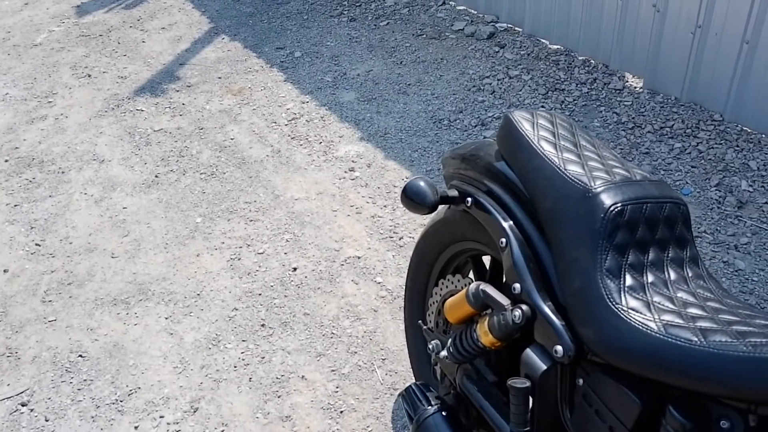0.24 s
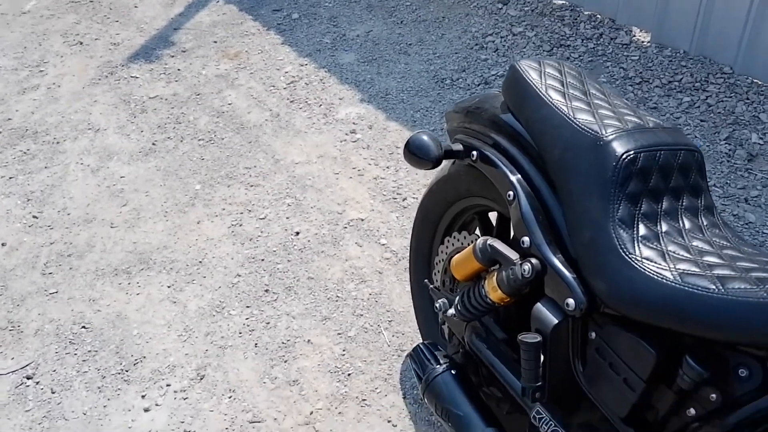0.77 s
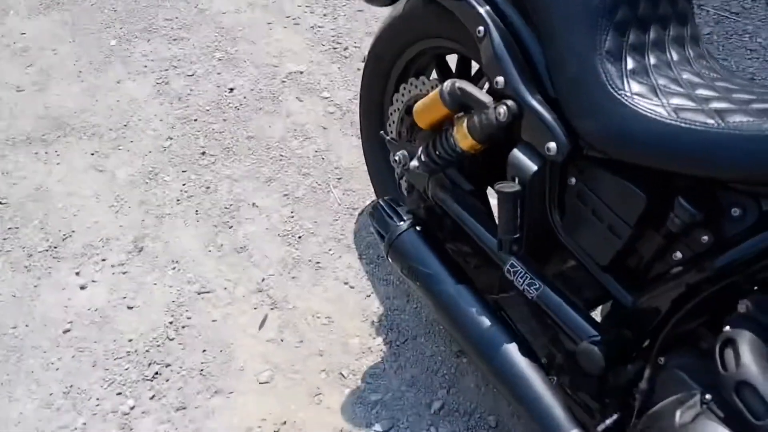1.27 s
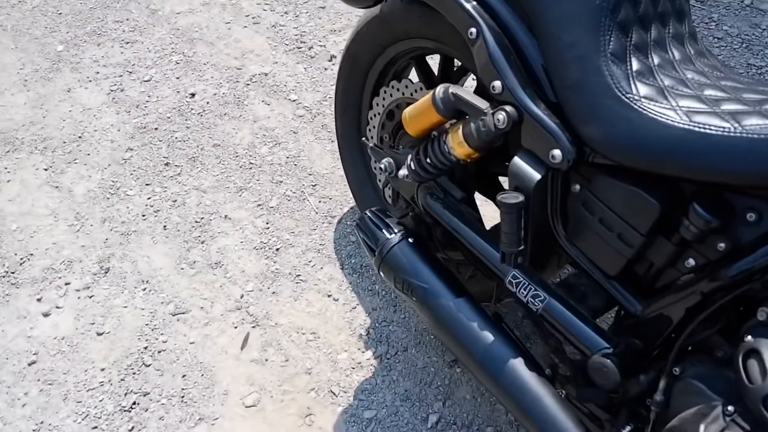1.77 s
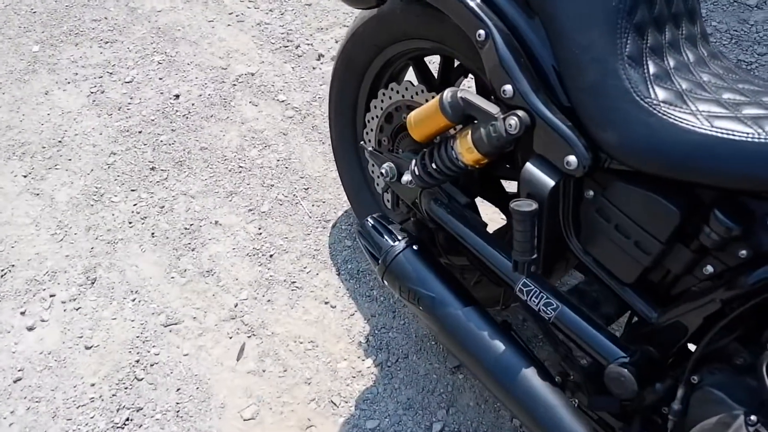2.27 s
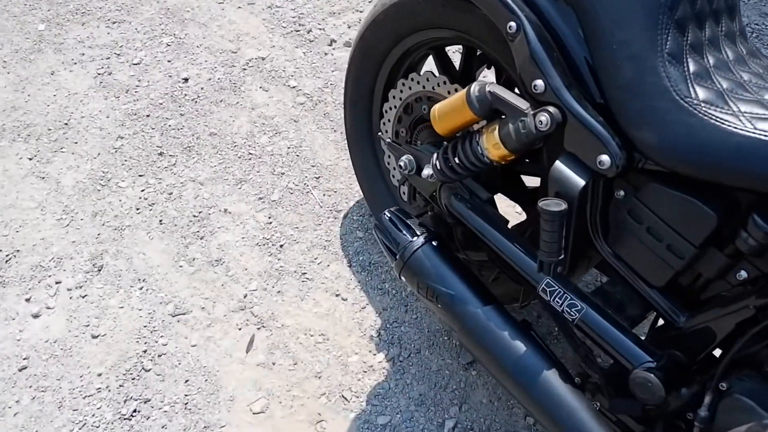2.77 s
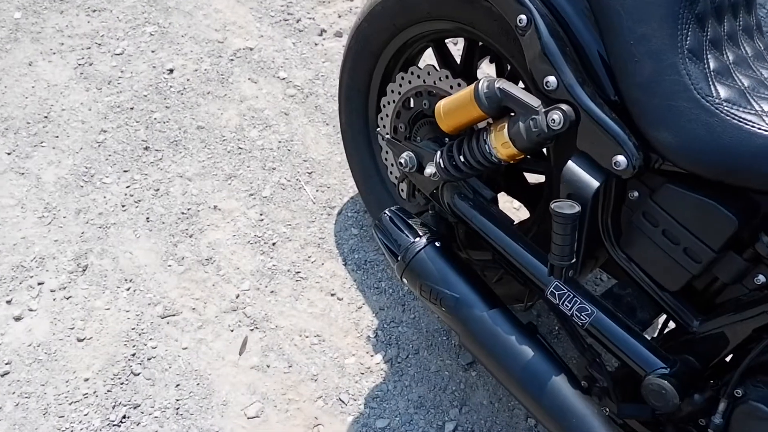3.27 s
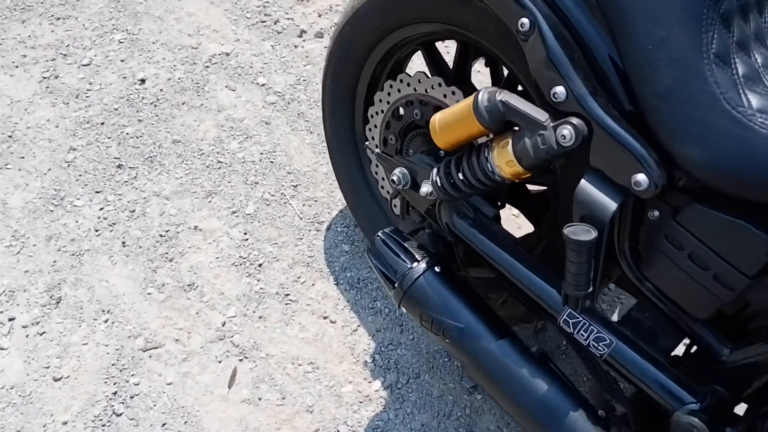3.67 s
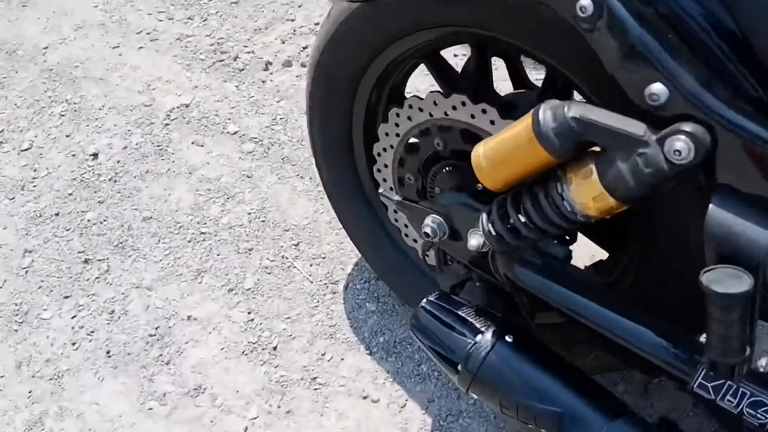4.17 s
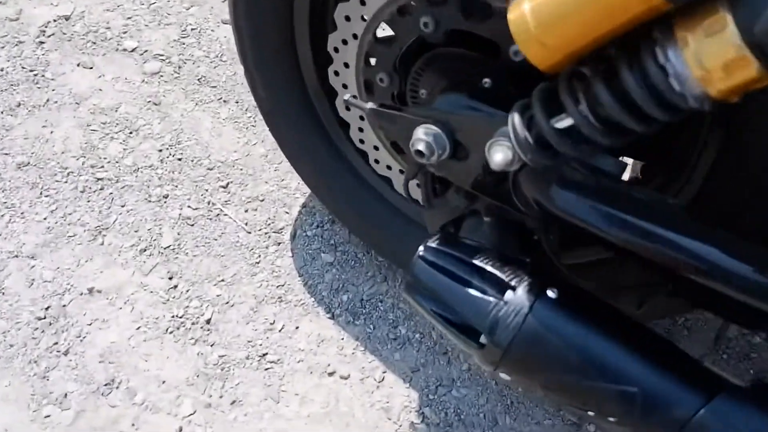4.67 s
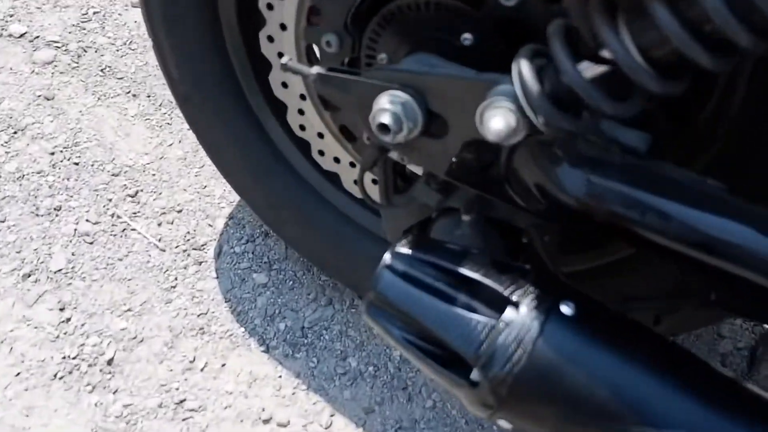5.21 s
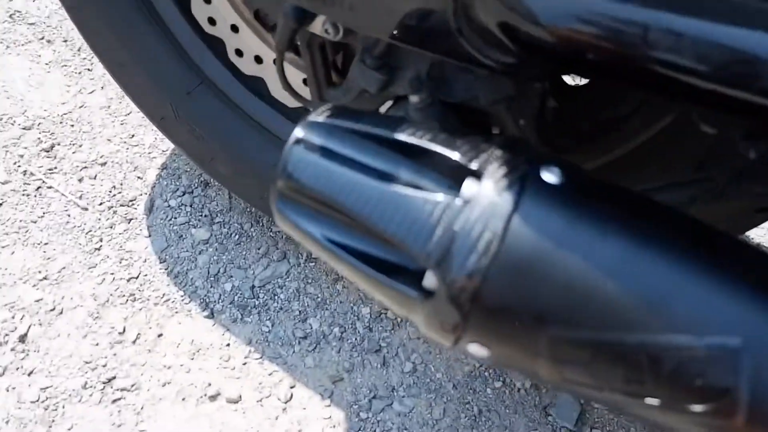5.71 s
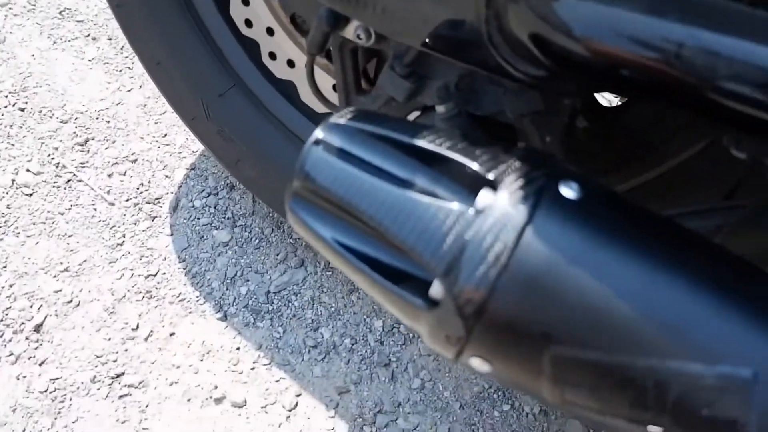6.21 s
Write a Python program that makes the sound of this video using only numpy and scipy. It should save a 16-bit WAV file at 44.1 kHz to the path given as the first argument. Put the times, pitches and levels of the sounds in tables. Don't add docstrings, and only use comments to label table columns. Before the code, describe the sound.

Deep, cracking throttle blips bark from a big twin motorcycle's exhaust outdoors, fall away in pops, and settle into uneven thumping close to the tailpipe.

```python
import sys
import numpy as np
from scipy import signal
from scipy.fft import rfft, irfft, next_fast_len
from scipy.io import wavfile
from scipy.ndimage import uniform_filter1d

SR = 44100
rng = np.random.default_rng(int(sys.argv[2]) if len(sys.argv) > 2 else 0)


def put_to_file(sound):
    columns = np.atleast_2d(sound).T
    safe = np.clip(columns, -1, 1)
    whole_steps = np.round(safe * 32767)
    wavfile.write(sys.argv[1], SR, whole_steps.astype(np.int16))


def gain_from_db(level_db):
    decades = np.asarray(level_db, float) / 20
    return 10 ** decades


N = 284439

# (from [s], to [s])
COASTS = [
    (2.18, 2.515),
    (2.88, 3.19),
]
# (open [s], shut [s], thump [dB], crack on opening [dB], crack on shutting [dB])
BLIPS = [
    (.04, .23, -3, -22, -25),
    (1.77, 2.12, -4, -24, -29),
    (2.72, 2.852, -6, -23, -26),
]
# (from [s], slug [ms], ring [Hz], ring width [Hz], bass cut [Hz], lead [ms])
PIPES = [
    (0, .3, 220, 165, 83, 1.8),
    (.1, .17, 230, 300, 60, 1.7),
    (.235, .3, 220, 165, 83, 1.8),
    (.6, .3, 140, 52, 67, 2.5),
    (1.75, .22, 220, 290, 80, 1.75),
    (2.16, .29, 206, 153, 70, 2.2),
    (3.6, .31, 122, 83, 55, 2.7),
    (4.6, .55, 126, 80, 52, 3.5),
]
# (front firing [s], engine cycles so far [count], cycle length then [ms])
CRANK = [(-.011, -1, 62), (.219, 3, 50), (.579, 10, 58), (1.036, 17, 76), (1.301, 20, 97), (1.6979, 24, 95),
         (1.9116, 27, 52), (2.1820, 34, 33.5), (2.3199, 38, 36.1), (2.5153, 43, 42), (2.691, 47, 43.5),
         (2.9122, 53, 31.7), (3.1517, 60, 37.5), (3.4987, 68, 57), (4.1611, 77, 90), (4.6618, 82, 113),
         (5.0128, 85, 116), (5.4552, 89, 109), (6.463, 98, 111)]
# (time [s], gear activity [dB], pumping in the pipe [dB], gas rush [dB])
BETWEEN = [(0, -33, -8.5, -21), (.45, -47, -25.5, -43), (.8, -45.5, -15.5, -40), (1.2, -39.5, -12.5, -33),
           (1.42, -36, -13.5, -29), (1.75, -38, -15, -33), (2.05, -42.5, -16, -29.5),
           (2.35, -41.5, -10, -36.5), (2.9, -42, -23.5, -32.5), (3.12, -41.5, -16.5, -31.5),
           (3.5, -42, -16.5, -45.5), (4.05, -40.5, -15, -33.5), (4.5, -43.5, -21, -38.5),
           (5.0, -40.5, -21, -29), (5.35, -40.5, -17.5, -29), (5.6, -47.5, -22, -36.5),
           (5.8, -43.5, -24, -30), (6.45, -44, -22.5, -35.5)]
# (time [s], thump [dB], crack [dB])
POPS = [
    (1.6795, -7, -27),
    (2.528, -39, -57),
    (3.9696, -3, -35),
]


def in_time(rows):
    s, *columns = np.transpose(rows)
    return [np.interp(np.arange(N) / SR, s, column) for column in columns]


def at_hz(points, hz):
    point_hz, db = np.transpose(points)
    return np.interp(np.log(hz + 1), np.log(point_hz), db)


def rms_one(x):
    return x / np.sqrt(np.mean(x ** 2) + 1e-20)


def decay(x, ms):
    return signal.lfilter([1], [1, -np.exp(-1000 / (ms * SR))], x + 1e-18)


def rms_gate(train, rise_ms, fall_ms):
    swell = decay(decay(decay(train, fall_ms), rise_ms), rise_ms)
    return swell / (rise_ms * SR / 1000) ** 2


def resonate(x, hz, width_hz):
    r = np.exp(-np.pi * width_hz / SR)
    top = np.array([1, 0, -1]) * (1 - r * r) / 2
    return signal.lfilter(top, [1, -2 * r * np.cos(2 * np.pi * hz / SR), r * r], x)


def cut(x, order, hz, kind="low"):
    return signal.sosfilt(signal.butter(order, hz, kind, fs=SR, output="sos"), x)


def clicks(times, heights):
    out = np.zeros(N)
    at = np.round(np.asarray(times) * SR).astype(int)
    np.add.at(out, np.clip(at, 0, N - 1), heights)
    return out


def stereo_noise(spectrum):
    # (frequency [Hz], left-right likeness [0-1])
    likeness = [(300, 1), (1000, 0.98), (2500, 0.9), (5000, 0.89), (8000, 0.24), (12000, 0.33)]
    size = next_fast_len(N)
    hz = np.fft.rfftfreq(size, 1 / SR)
    mid, side = rfft(rng.standard_normal((2, size))) * gain_from_db(at_hz(spectrum, hz))
    alike = np.clip(at_hz(likeness, hz), 0, 1)
    ports = np.sqrt(1 + alike) * mid + np.sqrt(1 - alike) * side * [[1], [-1]]
    return rms_one(irfft(ports, size)[:, :N])


def nearest(s, times):
    return np.abs(s[:, None] - np.asarray(times)).argmin(axis=0)


def spans(rows, s):
    return sum((s >= row[0]) & (s < row[1]) for row in rows)


def crank_time(turns):
    s, cycle, ms = np.transpose(CRANK)
    k = np.clip(np.searchsorted(cycle, turns, "right") - 1, 0, len(s) - 2)
    span = cycle[k + 1] - cycle[k]
    u = (turns - cycle[k]) / span
    glide = span * u * (1 - u) * ((1 - u) * ms[k] - u * ms[k + 1]) / 1000
    return s[k] + (s[k + 1] - s[k]) * u * u * (3 - 2 * u) + glide, np.interp(turns, cycle, ms)


def firing_times(marked_s):
    cycles = np.arange(CRANK[0][1], CRANK[-1][1])
    rear_share = np.interp(crank_time(cycles)[1], [32, 36, 110], [.457, .44, .425])
    s = crank_time(np.column_stack([cycles + rear_share, cycles + 1]).ravel()[:-1])[0]
    at = nearest(s, marked_s)
    known_shift = {2 * cycle + 1: 0 for _, cycle, _ in CRANK}
    known_shift.update(zip(at, marked_s - s[at]))
    return s + np.interp(np.arange(len(s)), *np.transpose(sorted(known_shift.items()))), at


def all_firings():
    # (time [s], rear thump [dB], front minus rear [dB], crack [dB])
    shut_burn = [(0, -23, -3, -39), (.25, -16, -10, -26.5), (.6, -15, -1, -49), (1.0, -11.5, -8.5, -41.5),
                 (1.45, -9.5, 10, -45), (2.16, -5, -2, -34), (2.3, -6.5, 0, -32), (2.42, -9.5, 2.5, -32),
                 (2.52, -8, -0.5, -34), (2.58, -8, -17, -38), (2.87, -9.5, -2, -39), (3.03, -6, -2.5, -35),
                 (3.13, -8, 0, -31), (3.2, -16.5, -0.5, -34), (3.6, -6.5, -3, -50), (4.299, -21, 14, -50.5),
                 (4.752, -0.5, -2.5, -34), (6.45, -1, 2.5, -39.5)]
    # (time [s], thump [dB],
    # crack [dB])
    single_firings = [(.0178, -13, -42), (.2916, -10.5, -39), (.342, -11.5, -35), (2.1265, -11.5, -35),
                      (2.1595, -5, -41), (1.9116, -6, -25), (2.8268, -12, -23.5), (.0602, -3, -39),
                      (.0823, -22, -53), (.108, -1, -21.5), (.1366, -1.5, -23.5), (.1699, -4.5, -25),
                      (.1916, -4.5, -20.5), (.219, -6, -32), (1.6979, -0.5, -21.5), (1.7828, -3, -20),
                      (1.8519, -3.5, -21), (1.8782, -4, -26.5), (1.9292, -7, -29), (1.9578, -3.5, -28.5),
                      (2.0018, -7, -29), (2.0392, -4.5, -23.5), (2.0785, -3.5, -28.5), (2.112, -3, -30),
                      (2.7091, -1.5, -31.5), (2.7343, -1.1, -24), (2.7524, -3, -21), (2.7754, -5, -18),
                      (2.8127, -4.5, -19.5), (2.8424, -5.5, -28),
                      (3.5959, -10.5, -31.5), (0.5546, -13.5, -36), (0.7331, -10.5, -49), (0.9971, -13, -63),
            (1.154, -8, -51), (1.3974, -8, -49), (1.4943, -2.5, -38), (1.6, -3, -31.5), (2.5303, -5.5, -54),
            (2.5765, -10, -32), (2.6225, -7, -28.5), (3.247, -5.5, -31.5), (3.2902, -8.5, -29),
            (3.3316, -8, -30), (3.4197, -8, -29), (3.467, -6.5, -26.5), (3.528, -9.5, -30.5),
            (3.6189, -13, -27.5), (3.786, -4.5, -32), (3.911, -8, -30.5), (5.238, -0.5, -38),
            (4.1601, -1.5, -27.5), (4.1955, 3.5, -22.5), (4.4802, -0.5, -27.5), (4.891, -1.5, -34),
            (5.0603, -.5, -29.5), (5.502, 0, -29), (5.569, -6.5, -44), (5.6847, -4.5, -40.5),
            (5.797, -1.5, -35.5), (5.349, -2, -34.5), (5.8436, -3.5, -43), (5.9094, -3.5, -43),
            (5.9565, -0.5, -37.5), (6.021, -2.5, -38.5), (6.0668, -3.5, -43), (6.1297, -2, -39),
            (6.24, -2.5, -41), (6.352, -1.5, -42)]
    weak_s = [.247, .971, 1.304, 1.532, 1.74, 2.093, 2.144, 3.193, 3.939, 4.384, 4.713, 4.932, 5.176, 5.399,
              5.632, 6.285]
    dead_s = [.276, .319, 4.068, 4.117, 4.243, 4.289, 4.556]
    marked = np.array(sorted(single_firings))
    s, at = firing_times(marked[:, 0])
    t, *burn = np.transpose(shut_burn)
    thump_db, front_db, crack_db = (np.interp(s, t, column) for column in burn)
    loss_db = front_db * (np.arange(len(s)) % 2)
    for start, end, blip_db, first_db, last_db in BLIPS:
        on = (s >= start) & (s < end)
        thump_db[on] = blip_db
        crack_db[on] = np.interp(s[on], [start, end], [first_db, last_db])
        loss_db[on] = 0
    loss_db[nearest(s, weak_s)] = -13.5
    even_db, uneven_db = [.5, 1.5], [1.2, 2]
    scatter_db = rng.standard_normal((len(s), 2)) * np.where(spans(COASTS, s)[:, None], even_db, uneven_db)
    thump_db = thump_db + loss_db + scatter_db[:, 0]
    crack_db = crack_db + 0.97 * loss_db + scatter_db[:, 1]
    dead = nearest(s, dead_s)
    thump_db[dead] = thump_db[dead] - 25
    crack_db[dead] = crack_db[dead] - 8
    thump_db[at], crack_db[at] = marked[:, 1], marked[:, 2]
    return s, thump_db, crack_db


def pipe_response(slug_ms, ring_hz, width_hz, cut_hz, echoes):
    ms, gain = np.vstack([(0, 1), echoes]).T
    early, late = (clicks(ms / 1000, gain * part)[:SR // 12] for part in (ms < 14.1, ms >= 14.1))
    slug = early + cut(late, 2, 300)
    for _ in range(3):
        slug = decay(slug, slug_ms)
    out = cut(resonate(slug, ring_hz, width_hz), 4, cut_hz, "high")
    return out / -out[:SR // 200].min()


def thumps(s, thump_db):
    # (rear header delay [ms], rear gain [ratio], front header delay [ms], front gain [ratio])
    blip = [(1.5, 0.43, 1.6, 0.56), (5.4, -0.29, 3.4, 0.28), (8.5, 0.39, 5.6, -0.17),
            (22.7, 0.32, 8.5, 0.35), (35.7, 0.28, 14.0, 0.21)]
    opening = [(2.8, -.55, 2.4, -.42), (5.9, -.34, 5.4, -.38), (9.1, .19, 8.5, .37),
               (10.5, -.38, 10.5, -.37), (22.9, .16, 14.0, .3)]
    cooling = [(3.6, 0.15, 1.8, -0.47), (5.6, -0.13, 5.6, -0.69), (23.6, 0.13, 9.6, -0.3),
               (31.4, 0.12, 10.7, -0.58), (38.6, -0.14, 24.9, -0.39)]
    hot = [(2.7, -0.49, 2.7, -0.4), (4.7, -0.4, 4.9, -0.53), (8.9, 0.24, 9.3, 0.22),
           (10.5, -0.24, 10.5, -0.55), (14.3, 0.38, 16.1, -0.27)]
    falling = [(5.0, -.1, 1.4, -.22), (6.8, .25, 4.8, -.45), (8.6, .4, 6.4, .42), (11.8, -.15, 10.5, -.43),
               (14.7, .25, 14.8, .25), (25, -.16, 32, .1)]
    slowing = [(2.0, -0.71, 2.2, -0.76), (3.3, -0.26, 7.4, 0.45), (6.2, -0.32, 12.2, 0.31),
               (10.9, -0.28, 13.8, 0.69), (18.0, -0.17, 31.4, -0.53)]
    close_by = [(1.8, -.3, 2.0, -.35), (4.0, .2, 10.3, -.15), (10.5, .27, 22.7, .42),
                (14.7, .15, 28.6, .55), (16.2, .63, 31.5, -.2), (33.5, .14, 34.1, .3)]
    state = np.searchsorted([row[0] for row in PIPES], s, "right") - 1
    state[spans(BLIPS[1:], s) > 0] = 4
    front = np.arange(len(s)) % 2
    out = np.zeros(N)
    for k, echoes in enumerate([blip, opening, blip, cooling, hot, falling, slowing, close_by]):
        start, slug_ms, ring_hz, width_hz, cut_hz, lead_ms = PIPES[k]
        for header, taps in enumerate(np.hsplit(np.array(echoes), 2)):
            train = clicks(s - lead_ms / 1000, gain_from_db(thump_db) * (state == k) * (front == header))
            response = pipe_response(slug_ms, ring_hz, width_hz, cut_hz, taps)
            out += signal.oaconvolve(train, response)[:N]
    return out


def punch(s, thump_db):
    # (frequency [Hz], width [Hz], level [dB], throttle open adds [dB],
    # coast adds [dB], nearness to the tailpipe adds [dB])
    outlet = [(470, 550, -24.5, 16.5, 3.5, -2.5), (670, 320, -18.5, 9.5, 8, 1),
              (840, 520, -21.5, 1.5, 10.5, 7.5), (1208, 230, -35.5, 5, 7, 10.5),
              (1617, 104, -43, 10.5, 11.5, 3.5), (2310, 700, -39.5, 5.5, -2, 5),
              (313, 45, -34, 3, 8.5, -2.5)]
    coast, blipped, near = spans(COASTS, s), spans(BLIPS, s), s > PIPES[-1][0]
    face_s = s - .0012 + .0055 * coast * (np.arange(len(s)) % 2)
    heat_db = np.where(s > PIPES[1][0], 0.5, -7) * spans(BLIPS[:1], s)
    vary_db = rng.normal(0, 1, (len(s), len(outlet))) * (2.5 - 2 * coast[:, None])
    out = 0
    for k, (hz, width, db, open_db, coast_db, close_db) in enumerate(outlet):
        state_db = open_db * blipped + coast_db * coast + close_db * near
        face = clicks(face_s, gain_from_db(thump_db + db + heat_db + state_db + vary_db[:, k]))
        out = out + (-1) ** k * SR / width / np.pi * resonate(face + 1e-18, hz, width)
    out = cut(out, 2, 3500)
    return out + gain_from_db(-3.5) * np.roll(out, round(.0165 * SR))


def cracks(s, crack_db, bed_db):
    # (frequency [Hz], level per Hz [dB])
    crack_colour = [(290, -35), (500, -3), (562, -24), (690, -11.5), (953, -9.5), (1320, -21),
                    (1600, -10.5), (1910, -18.5), (2570, -14), (3790, -26), (4420, -21.5), (5430, -24),
                    (6850, -30), (7500, -28), (10900, -50.5), (14200, -75), (22000, -120)]
    bed = gain_from_db(bed_db[(s * SR).astype(int)])
    above = np.sqrt(np.maximum(gain_from_db(crack_db) ** 2 - bed ** 2, 0))
    train = clicks(s - .0018, above)
    burst = rms_gate(train, rise_ms=0.82, fall_ms=1.46)
    jet = gain_from_db(-11) * rms_gate(train, rise_ms=3.06, fall_ms=7.15)
    wall = gain_from_db(-49.0) * np.roll(burst, round(0.011 * SR))
    ragged = gain_from_db(2.46 * rms_one(decay(rng.standard_normal(N), 0.72)))
    return gain_from_db(12) * (burst + wall + jet) * ragged * stereo_noise(crack_colour)


def knocks(s, crack_db):
    # (frequency [Hz], width [Hz], level [dB])
    can = [(540, 120, -6), (940, 150, -2.5), (1178, 160, -12.5), (1620, 70, -9), (2590, 146, -11),
           (4300, 300, -24)]
    strength = gain_from_db(rng.normal(0, 3.5, (len(s), len(can))) + crack_db[:, None])
    out = np.zeros(N)
    for k, (hz, width, db) in enumerate(can):
        out += gain_from_db(db) * SR / width * resonate(clicks(s, strength[:, k]), hz, width)
    return gain_from_db(-22.5) * (out + gain_from_db(-10.5) * np.roll(out, round(.0165 * SR)))


def drone(drone_db):
    # (frequency [Hz], width [Hz], level [dB])
    pipe_modes = [(69.3, 30, -8), (144.7, 21.9, 0), (210.5, 75.5, -3.5), (320.5, 37, -13.5)]
    hum = np.zeros(N)
    for hz, width, db in pipe_modes:
        white = rng.standard_normal(N)
        hum += gain_from_db(db) * rms_one(resonate(resonate(white, hz, width), hz, 2 * width))
    time = np.arange(N) / SR
    even = sum(np.clip(np.minimum(time - start, end - time) / .03, 0, 1) for start, end in COASTS)
    return gain_from_db(drone_db - 2.5 - 10 * even) * rms_one(hum)


def clatter(s, stronger_db, rasp_db, clatter_db):
    # (frequency [Hz], level per Hz [dB])
    rasp_far = [(250, -26), (340, -4), (390, -9), (450, -1), (580, -4), (710, -16), (930, -11), (1500, -18),
                (1950, -45), (3300, -120)]
    # (frequency [Hz], level per Hz [dB])
    rasp_near = [(250, -29), (430, -18), (503, -5), (848, 13.5), (1080, -4), (1230, 8), (1500, -7),
                 (1950, -31.5), (3300, -120)]
    # (frequency [Hz], level per Hz [dB])
    gear_colour = [(710, -12), (1200, -1), (1720, 0), (1960, -4), (2680, -2.5), (2910, -5.5), (3670, -14.5),
                   (4130, -8), (4970, -8.5), (5870, -13.5), (7820, -16), (10300, -25.5), (10900, -25.5),
                   (14200, -74.5), (22000, -120)]
    tick_s = (s[:, None] + rng.uniform(0, .05, (len(s), 3))).ravel()
    tick_train = clicks(tick_s, rng.exponential(0.41, len(tick_s)))
    throb = 1.13 + rms_gate(tick_train, rise_ms=0.44, fall_ms=8.6)
    close = np.clip((np.arange(N) / SR - 4.2) / .5, 0, 1)
    rasp = np.sqrt(1 - close) * stereo_noise(rasp_far) + np.sqrt(close) * stereo_noise(rasp_near)
    rush_heights = np.outer([1, .5], gain_from_db(0.47 * stronger_db)).ravel()
    rush = rms_gate(clicks(np.append(s, s + .0165), rush_heights), rise_ms=1.0, fall_ms=3.0)
    rasp = rasp * rms_one(.15 + rush)
    return rms_one(throb) * (gain_from_db(rasp_db) * rasp + gain_from_db(clatter_db) * stereo_noise(gear_colour))


def whine(clatter_db):
    hz, width_hz = 2640, 45
    note = resonate(resonate(rng.standard_normal(N), hz, width_hz), hz, width_hz)
    return gain_from_db(clatter_db - 15) * rms_one(note)


def ticks():
    # (time [s], peak [dB])
    kinks = [(0.0588, -50.5), (0.1057, -44.5), (0.136, -53), (0.168, -60), (0.3007, -68.5), (1.695, -43.5),
             (1.7838, -50), (1.8517, -46.5), (2.0405, -61), (2.7344, -64), (2.7496, -46.5), (2.7753, -38.5),
             (3.9684, -51), (4.194, -48.5), (4.4786, -54), (4.5915, -63), (5.059, -54), (5.2857, -51),
             (5.3456, -47), (5.5004, -54.5), (5.5697, -68), (5.9584, -48)]
    s, db = np.transpose(kinks)
    return cut(clicks(s, gain_from_db(db + 8)), 4, 10500, "high")


def pops():
    s, thump_db, _ = np.transpose(POPS)
    shape = pipe_response(slug_ms=0.15, ring_hz=340, width_hz=98, cut_hz=120, echoes=[(5.6, 0.03), (9.1, 0.54)])
    return signal.oaconvolve(clicks(s - .0016, gain_from_db(thump_db)), shape)[:N]


def scene():
    s, thump_db, crack_db = all_firings()
    clatter_db, pumping_db, rush_db = in_time(BETWEEN)
    time = np.arange(N) / SR
    close_s = PIPES[-1][0]
    opened, coasting = (uniform_filter1d(1. * spans(rows, time), size=2000) for rows in (BLIPS, COASTS))
    rasp_db = rush_db - 1.5 * opened - 4 * coasting - 5 * (time > close_s)
    low = thumps(s, thump_db) + pops() + drone(pumping_db - opened)
    wall = gain_from_db(-33.5) * np.roll(low, round(0.0043 * SR))
    front, coast = np.arange(len(s)) % 2, spans(COASTS, s)
    torn_s = s + .0015 * spans(BLIPS[:1], s) + .0012 * (s > close_s) + .0055 * coast * front
    torn_db = crack_db - 6 * coast * (1 - front)
    blasts = np.hstack([[torn_s, torn_db], np.array(POPS)[:, [0, 2]].T])
    low = low + punch(s, thump_db) + knocks(*blasts)
    low = low - 0.75 * resonate(low, hz=720, width_hz=130)
    stronger_db = thump_db - uniform_filter1d(thump_db, size=7)
    exhaust = low + wall * [[1], [-1]] + cracks(*blasts, clatter_db)
    return exhaust + clatter(s, stronger_db, rasp_db, clatter_db) + whine(clatter_db)


def roll_off(x):
    return signal.sosfilt(signal.butter(12, 15800, fs=SR, output="sos"), x)


def record(dry):
    # (frequency [Hz], left minus right [dB])
    port_lean = [(100, -.3), (500, -.3), (1000, -1.3), (4000, -1.1), (8000, -.1)]
    # (frequency [Hz], level per Hz [dB])
    hiss_colour = [(9000, -14.5), (10800, -7), (12200, -4), (13500, -3.5), (15300, -7.5), (16000, -36.5)]
    size = next_fast_len(N)
    lean = gain_from_db(at_hz(port_lean, np.fft.rfftfreq(size, 1 / SR)) * [[.5], [-.5]])
    x = cut(irfft(rfft(dry, size) * lean, size)[:, :N], 4, 38, "high")
    x = cut(x, 8, 10300)
    hiss_db = -81.5 + .8 * (in_time(BETWEEN)[0] + 44.5)
    x = x + gain_from_db(hiss_db) * stereo_noise(hiss_colour) + ticks()
    return roll_off(np.clip(x, -.98, .98))


dry = scene()
out = record(dry)
put_to_file(out)
```